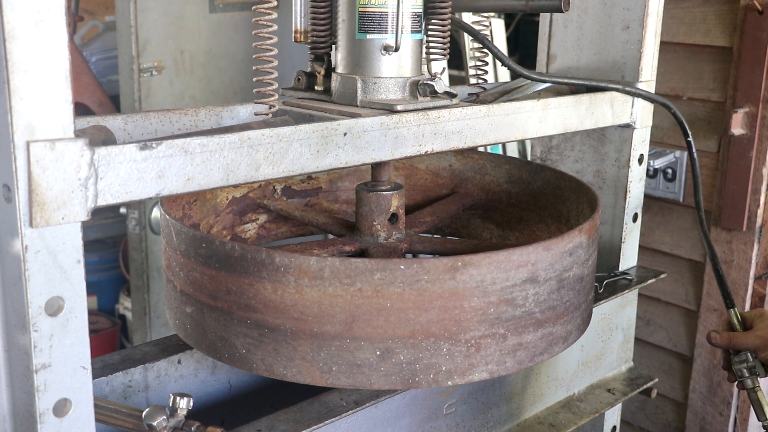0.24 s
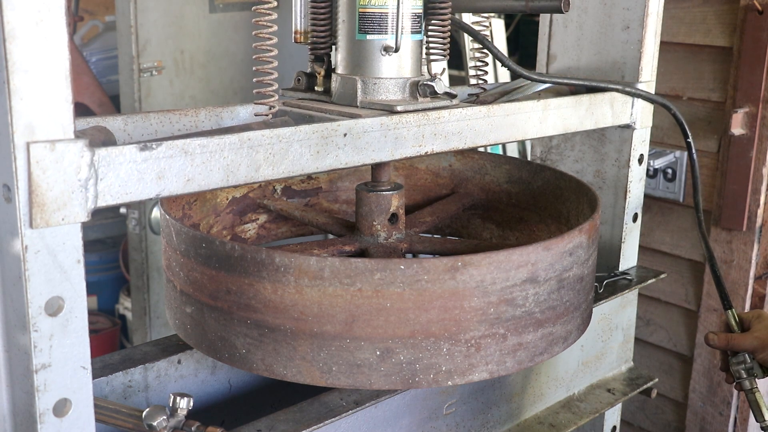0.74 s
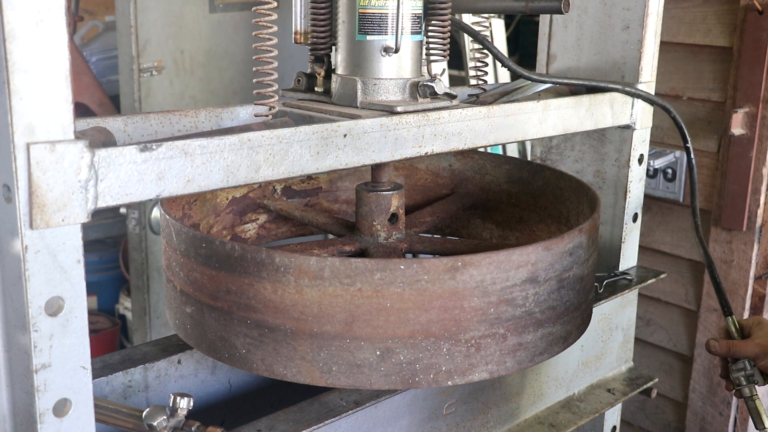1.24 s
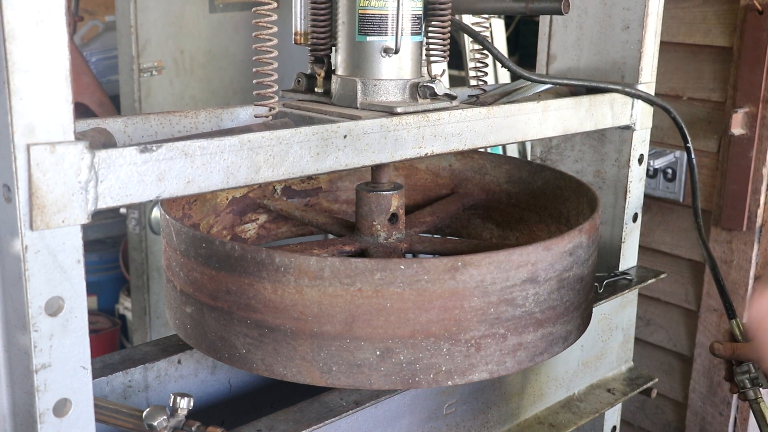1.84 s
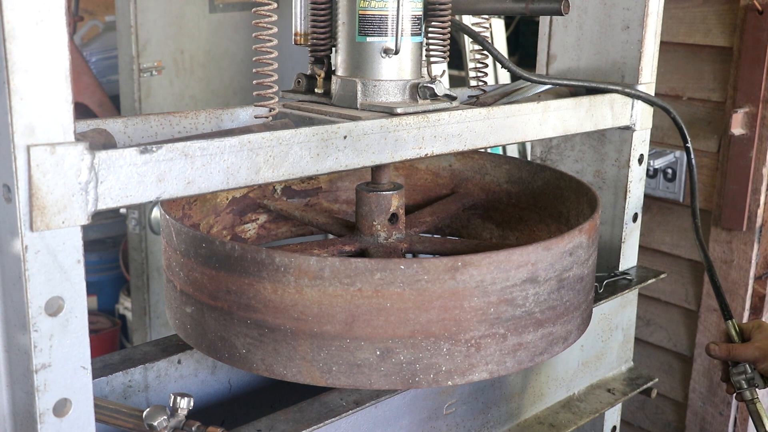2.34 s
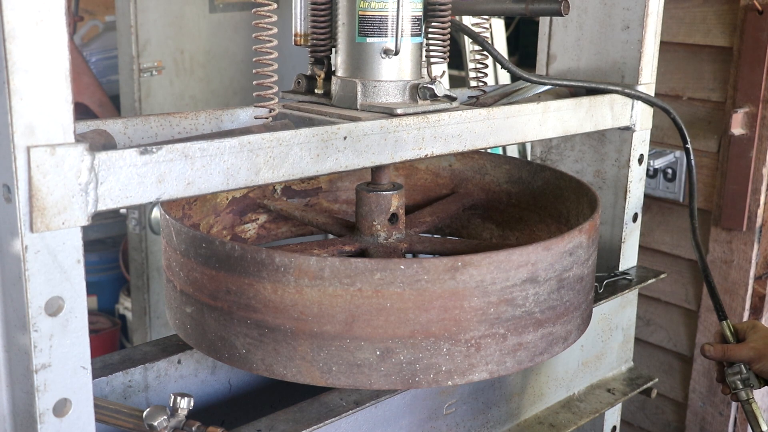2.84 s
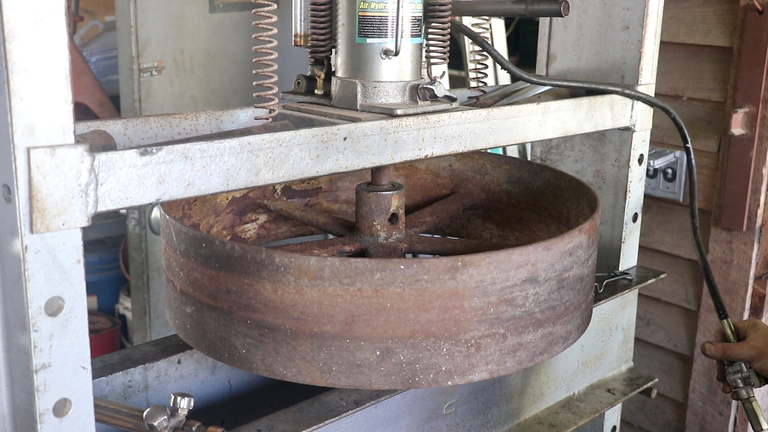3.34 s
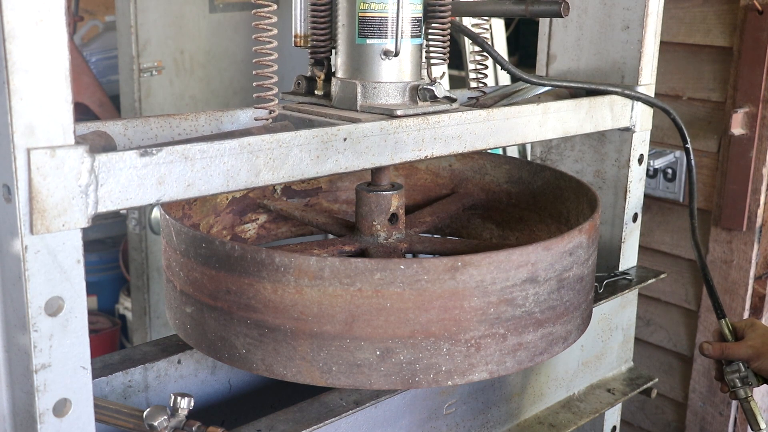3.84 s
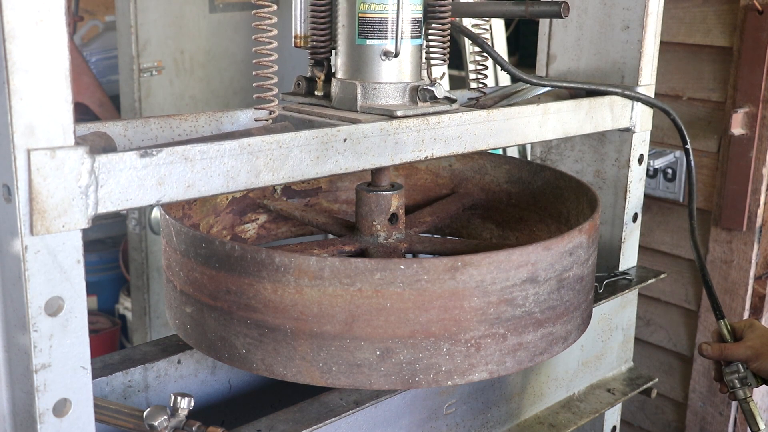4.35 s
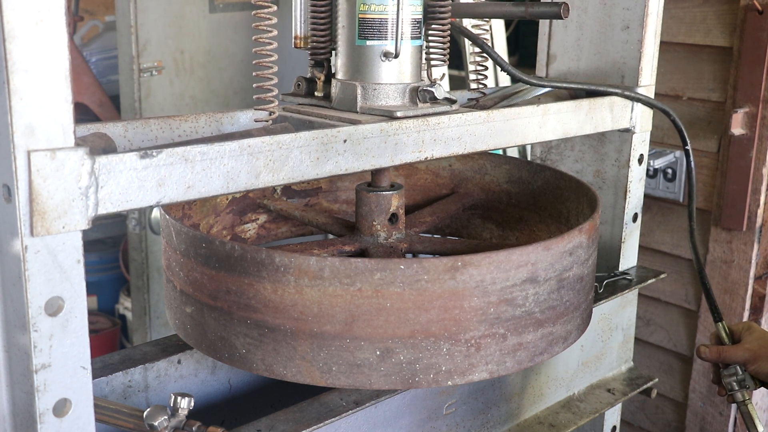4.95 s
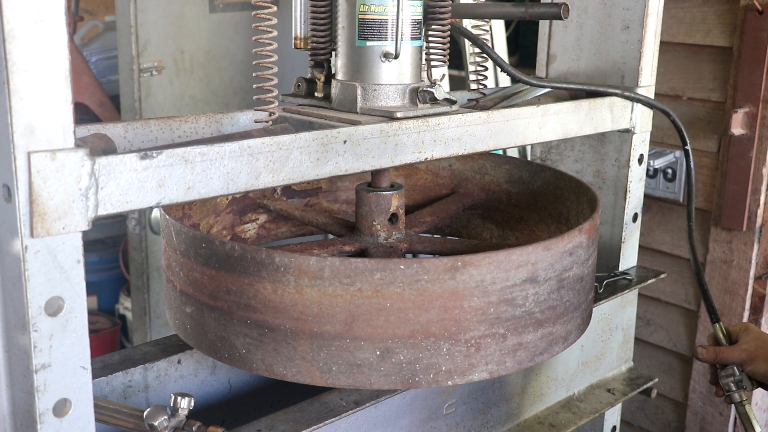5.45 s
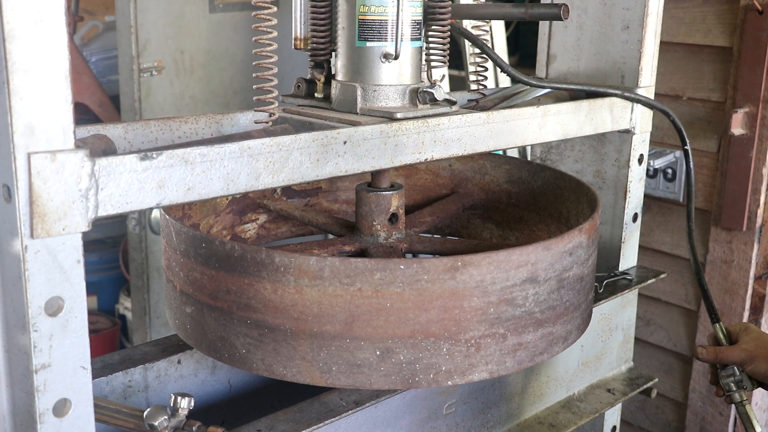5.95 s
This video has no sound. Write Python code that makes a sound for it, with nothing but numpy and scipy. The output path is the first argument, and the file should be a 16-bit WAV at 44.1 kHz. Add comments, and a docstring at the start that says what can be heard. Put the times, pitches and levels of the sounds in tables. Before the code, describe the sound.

Air hisses and spits as a jack pump knocks about six times a second, lightly ringing a steel workshop press.

```python
"""A wooden shed, one mono microphone close to a steel shop press. Air is already hissing as an
air-over-hydraulic bottle jack pumps six times a second, pushing a shaft out of an iron pulley.
On each stroke the air piston kicks, the exhaust spits, and 33 ms later the piston lands with a dull
knock that rings the press; the hiss swells as the pressure returns. Just under a second in comes one
soft thud. Over the six seconds, under the growing load, the frame pings more brightly."""
import sys
import numpy as np
from scipy import signal
from scipy.fft import rfft, irfft, next_fast_len
from scipy.io import wavfile
from scipy.ndimage import map_coordinates

SR = 44100
rng = np.random.default_rng(int(sys.argv[2]) if len(sys.argv) > 2 else 0)


def file_out(sig):
    """Save sig as 16-bit WAV at sys.argv[1]."""
    # one column per channel
    cols = np.atleast_2d(sig).T
    # limit, then scale
    lim = np.clip(cols, -1, 1)
    pcm = np.round(lim * 32767).astype(np.int16)
    wavfile.write(sys.argv[1], SR, pcm)


N = 272538
TIME = np.arange(N) / SR
AGE = np.arange(SR) / SR   # time since a blow [s]

# the shed's room tone: (frequency [Hz], level [dB per Hz])
ROOM_TONE = [(20, -82), (45, -92), (90, -93), (160, -84), (300, -87), (2000, -100)]
# leaking air: (frequency [Hz], level [dB per Hz])
HISS_SPECTRUM = [(30, -81), (90, -83.5), (180, -73), (420, -72), (800, -73), (1200, -68.5), (1900, -71.5),
                 (2400, -75), (3400, -69), (5000, -67), (6500, -71), (9200, -80.5), (12500, -75),
                 (15800, -80)]
# the hiss rises and falls with the air pressure: (time [s], level [dB])
HISS_SWELL = [(0.21, -0.1), (0.55, 0.9), (0.71, -1.1), (1.21, 1.1), (1.38, -0.4), (1.54, 0.5), (1.87, -2.8),
              (2.03, 0.1), (2.85, 0.5), (3.17, -1.7), (3.5, 2.0), (3.67, -0.8), (3.99, 0.6), (4.16, -0.9),
              (4.97, 0.9), (5.61, 0.4), (5.77, -0.9), (6.09, 0.1)]
# pace of the pump: (time [s], rate [strokes per s])
PUMP_PACE = [(0.09, 6.044), (0.92, 6.011), (1.65, 6.162), (2.3, 6.101), (2.8, 6.114), (3.15, 6.076),
             (3.6, 6.134), (4.4, 6.161), (6.1, 6.243)]
# quickly damped modes of the jack body: (frequency [Hz], level [dB], t60 [s])
JACK_BODY_MODES = [(192, -39.5, 0.054), (352, -34.5, 0.031), (636, -28, 0.032), (910, -24.5, 0.024),
                   (1002, -27.5, 0.023), (1224, -30.5, 0.015), (1480, -28.5, 0.028), (1875, -27, 0.02),
                   (2382, -38.5, .03), (3050, -49.5, 0.066)]
# long modes of the press frame and pulley: (frequency [Hz], level [dB], t60 [s])
PRESS_MODES = [(149.3, -41.5, 0.32), (181.8, -34.5, 0.22), (206.4, -35.5, 0.16), (225.9, -42.5, 0.39),
               (286, -50.5, 0.33), (309.5, -36, 0.091), (365.6, -38, 0.12), (397.8, -42.5, 0.47),
               (417, -40.5, 0.99), (463.2, -44, 0.83), (618, -32.5, .42), (653.8, -33, .29),
               (714, -47, 0.41), (785, -44.5, 0.57), (888.4, -37, 0.17), (915, -45, .5), (971, -37.5, 0.28),
               (1003, -38, 0.77), (1057, -36.5, 0.25), (1171, -37, 0.42), (1192, -41, 0.64),
               (1237, -33, 0.44), (1310, -38, 0.24), (1437, -42, 0.37), (1487, -40, 0.32),
               (1549, -40, 0.22), (1950, -46, 0.68), (2468, -26, 0.085), (2493, -31, 0.098),
               (3146, -42, 0.41)]
# the spit at the exhaust port: (frequency [Hz], level [dB per Hz])
SPIT_SPECTRUM = [(30, -71), (150, -67), (500, -66), (1100, -62.5), (2000, -61.5), (3500, -59.5),
                 (5200, -57.5), (7000, -62.5), (9500, -66.5), (12500, -64.5), (15800, -69.5)]
# spent air trailing off: (frequency [Hz], level [dB per Hz])
TAIL_SPECTRUM = [(40, -85), (170, -64.5), (500, -60.5), (1200, -66), (2000, -63.5), (2500, -63),
                 (5000, -60.5), (7000, -65.5), (9500, -71), (12500, -70), (15800, -80)]
# the piston's landing and rebounds: (time after landing [s], level [dB])
PISTON_BOUNCES = [(0, 5.5), (.0028, 0.5), (.0058, -11.5)]
# the landing's crack and wash of weak modes: (frequency [Hz], level [dB per Hz])
KNOCK_SPECTRUM = [(60, -111), (200, -66), (600, -66), (1100, -68), (1600, -75), (2200, -73.5),
                  (3200, -72.5), (6000, -87), (15000, -105)]

FIRST_STROKE_S, LANDING_S = .0946, .0328   # first kick heard; delay from kick to landing
KICK_GAIN_DB, KNOCK_LOSS_DB = 1.0, .9   # from no load to full, kicks firm up and landings soften
PING_DB, PING_GAIN_DB, PING_ABOVE_HZ = -1.0, 3.8, 2200   # top frame modes: unloaded, gain at full load


def from_db(db):
    """Decibels to gain."""
    return 10 ** (np.asarray(db) / 20)


def dying(age, t60):
    """Exponential decay that starts at age zero."""
    return (age >= 0) * from_db(-60 * np.maximum(age, 0) / t60)


def curve(rows, s):
    """Value of a control at the given time."""
    return np.interp(s, *np.transpose(rows))


def flutter(per_s):
    """Random wavering of spread about 1."""
    return np.interp(TIME * per_s, np.arange(N), rng.standard_normal(N))


def coloured_noise(spectrum):
    """Noise with the given power per Hz."""
    hz, db = np.transpose(spectrum)
    padded = next_fast_len(N)
    bins = np.maximum(np.fft.rfftfreq(padded, 1 / SR), 1)
    gain = from_db(np.interp(np.log(bins), np.log(hz), db)) * np.sqrt(SR / 2)
    return irfft(rfft(rng.standard_normal(padded)) * gain, padded)[:N]


def place(sounds, times, levels_db):
    """Lay down one sound at all the times, or a sound of its own at each."""
    out, size = np.zeros(N + 3 * SR), sounds.shape[-1]
    for sound, s, gain in zip(np.broadcast_to(sounds, (len(times), size)), times, from_db(levels_db)):
        at = SR + round(s * SR)
        out[at:at + size] += gain * sound
    return out[SR:SR + N]


def load(s):
    """The load on the shaft builds steadily, 0 to 1."""
    return np.clip(s / TIME[-1], 0, 1)


def stroke_times():
    """Each stroke follows the last at the current pace; the pump is already running."""
    times = [FIRST_STROKE_S - 1 / curve(PUMP_PACE, 0), FIRST_STROKE_S]
    while (following := times[-1] + 1 / curve(PUMP_PACE, times[-1])) < TIME[-1]:
        times.append(following)
    return np.array(times)


def current_stroke(times):
    """For each sample, the stroke under way and its age [s]."""
    stroke = np.clip(np.searchsorted(times, TIME) - 1, 0, None)
    return stroke, TIME - times[stroke]


def hiss(times, sag_db, refill_s):
    """The leak sags after each kick and swells as the pressure returns."""
    _, age = current_stroke(times)
    pressure_db = -sag_db * np.interp(age, [0, .02, .045, refill_s], [0, 1, 1, 0])
    level_db = curve(HISS_SWELL, TIME) + pressure_db + .6 * flutter(60)
    return from_db(level_db) * coloured_noise(HISS_SPECTRUM)


def restless_jet(air, depth_db, per_s, bands=40):
    """A jet never holds one colour: narrow neighbouring bands swell and fade independently."""
    hz, s, frames = signal.stft(air, SR, nperseg=1024)
    band = np.interp(hz, np.geomspace(800, 16000, bands), np.arange(bands))
    grid = np.meshgrid(band, s * per_s, indexing="ij")
    swell = map_coordinates(rng.standard_normal((bands, len(s))), grid, order=1, mode="nearest")
    return signal.istft(frames * from_db(depth_db * swell), SR)[1][:N]


def shed(sound, t60, wet_db, count=40):
    """Reflections off the press and plank walls reach the microphone within 14 ms; power is kept."""
    response, delays = np.zeros(SR // 10), rng.uniform(.0006, .014, count)
    response[(delays * SR).astype(int)] = rng.normal(0, 1, count) * dying(delays, t60)
    response *= from_db(wet_db) / np.linalg.norm(response)
    response[0] = 1   # direct sound
    return signal.oaconvolve(sound, response)[:N] / np.linalg.norm(response)


def ring(modes, times, levels_db, scatter_db, rise_s, tilt_db=0, ping_db=0):
    """Each blow strikes every mode a little differently; a soft blow tilts them down per octave."""
    hz, db, t60 = np.transpose(modes)
    age = AGE[AGE < t60.max()]
    tones = np.sin(2 * np.pi * hz[:, None] * age) * dying(age, t60[:, None])
    tones *= 1 - np.exp(-age / rise_s)
    colour_db = tilt_db * np.log2(hz / hz[0]) + ping_db * (hz > PING_ABOVE_HZ)
    strengths = from_db(db + colour_db + rng.normal(0, scatter_db, (len(times), len(hz))))
    return place(strengths @ tones, times, levels_db)


def kick(times, pulse_db, pulse_hz, centre_s):
    """The valve trips: one pressure swing and a soft shove on jack and frame."""
    phase = 2 * np.pi * pulse_hz * (AGE - centre_s)
    swing = from_db(pulse_db) * phase * np.exp((1 - phase ** 2) / 2)
    levels_db = rng.normal(0, .5, len(times))
    shoves = times + centre_s
    jack = ring(JACK_BODY_MODES, shoves, levels_db + 1.5, scatter_db=1, rise_s=.00088, tilt_db=-3.5)
    frame = ring(PRESS_MODES, shoves, levels_db - 1, scatter_db=1, rise_s=.0034, tilt_db=-2.5)
    firmness = from_db(KICK_GAIN_DB * (load(TIME) - .5))
    return firmness * (place(swing, times, levels_db) + jack + frame)


def exhaust(times, open_s, peak_s, shut_s, shut_t60, tail_t60):
    """The port opens and spits; the sharper the spit, the less spent air is left to trail off."""
    stroke, age = current_stroke(times)
    sharp_db = rng.normal(0, .9, len(times))[stroke]
    valve_age = age + rng.normal(0, .00038, len(times))[stroke]   # the valve sticks a little
    opening = np.clip((valve_age - open_s) / (peak_s - open_s), 0, 1)
    closing = dying(np.maximum(valve_age - shut_s, 0), shut_t60)
    turbulence_db = .75 * flutter(900)
    spit = closing * from_db(.2 + sharp_db + turbulence_db)
    tail = dying(age, tail_t60) * from_db(-.1 - .6 * sharp_db + 1.26 * flutter(300))
    return opening * (spit * coloured_noise(SPIT_SPECTRUM) + tail * coloured_noise(TAIL_SPECTRUM))


def knock(times, jack_db, crack_db, crack_t60, wash_db, wash_t60):
    """The piston lands and rebounds in the jack; the frame and a wash of weak modes ring on."""
    landings = times + LANDING_S
    levels_db = -1 + .5 * curve(HISS_SWELL, landings)   # harder when the hiss is up
    levels_db -= KNOCK_LOSS_DB * (load(times) - .5)
    jack = sum(ring(JACK_BODY_MODES, landings + s, levels_db + db + jack_db,
                    scatter_db=1.1, rise_s=.00094) for s, db in PISTON_BOUNCES)
    ping_db = PING_DB + PING_GAIN_DB * load(landings)[:, None]
    frame = ring(PRESS_MODES, landings, levels_db, scatter_db=1.1, rise_s=.0032, ping_db=ping_db)
    crack = from_db(crack_db) * dying(AGE, crack_t60)
    wash = from_db(wash_db) * dying(AGE, wash_t60)
    return jack + frame + place(crack + wash, landings, levels_db) * coloured_noise(KNOCK_SPECTRUM)


def thud(at_s, peak_db, start_hz, end_hz, swell_s, glide_s):
    """A lone soft thud whose pitch drops as it fades."""
    hz = end_hz + (start_hz - end_hz) * np.exp(-AGE / glide_s)
    tone = -np.sin(2 * np.pi * np.cumsum(hz) / SR)
    envelope = (AGE / swell_s) ** 2 * np.exp(2 - 2 * AGE / swell_s)
    return place(tone * envelope, [at_s], [peak_db])


def scene():
    """Close to the press: air and metal on the same strokes, over room tone, alike in both channels."""
    times = stroke_times()
    spits = exhaust(times, open_s=.00057, peak_s=.0037, shut_s=.0055, shut_t60=.024, tail_t60=.18)
    leak = hiss(times, sag_db=3.5, refill_s=.17)
    jets = restless_jet(leak + spits, depth_db=1.44, per_s=14)
    air = shed(jets, t60=.07, wet_db=-12)
    kicks = kick(times, pulse_db=-24.5, pulse_hz=228, centre_s=.00251)
    knocks = knock(times, jack_db=1.25, crack_db=3, crack_t60=.071, wash_db=-5, wash_t60=.28)
    lone_thud = thud(at_s=.8545, peak_db=-21.5, start_hz=259, end_hz=60, swell_s=.0062, glide_s=.008)
    mix = air + kicks + knocks + lone_thud + coloured_noise(ROOM_TONE)
    return np.array([mix, mix])


def record(dry):
    """The small microphone thins the bass; the very top is cut."""
    bass_cut = signal.butter(1, 110, "high", fs=SR, output="sos")
    top_cut = signal.ellip(12, .1, 90, 15750, fs=SR, output="sos")
    return signal.sosfilt(np.vstack([bass_cut, top_cut]), dry)


dry = scene()
out = record(dry)
file_out(out)
```